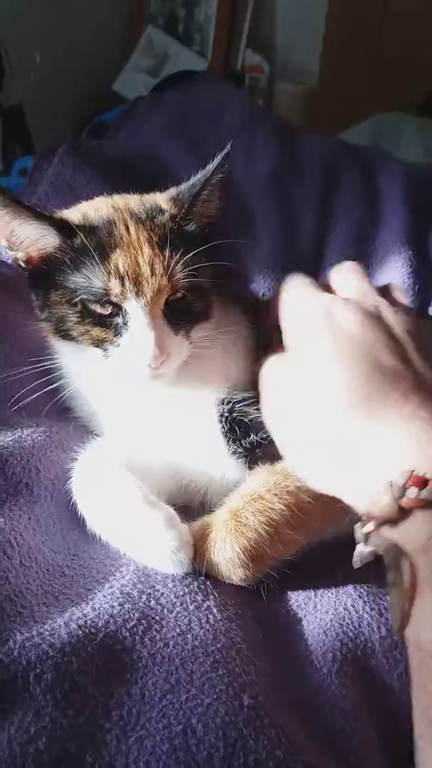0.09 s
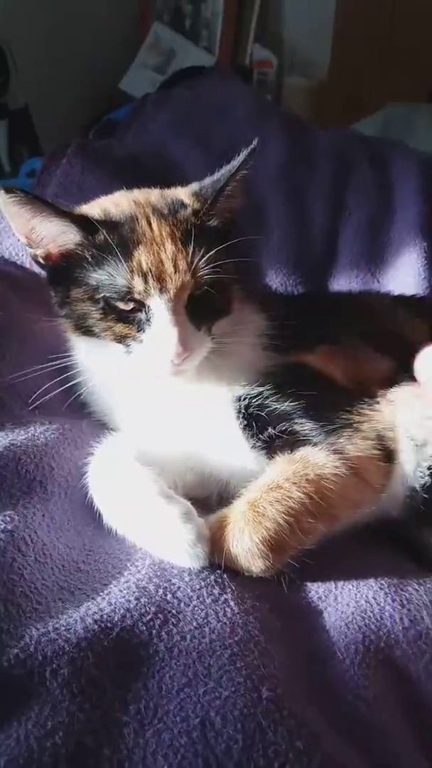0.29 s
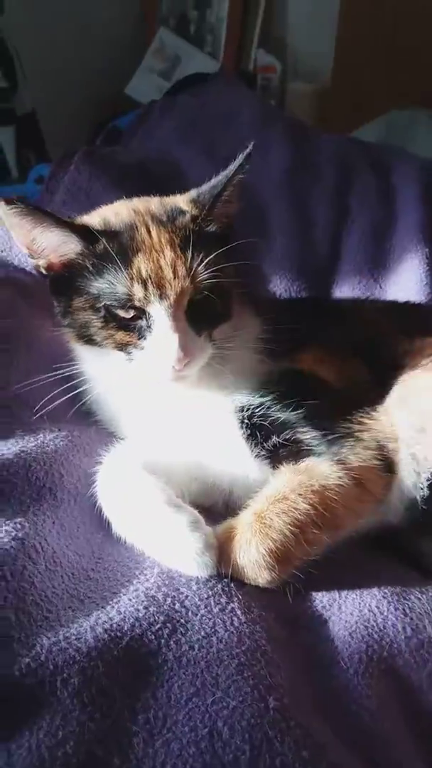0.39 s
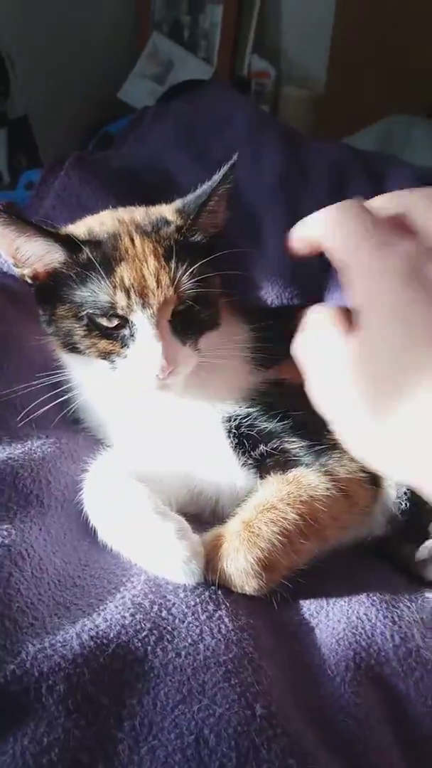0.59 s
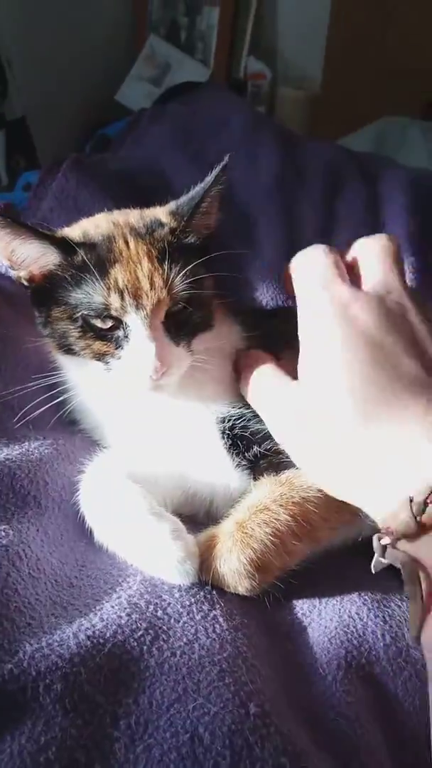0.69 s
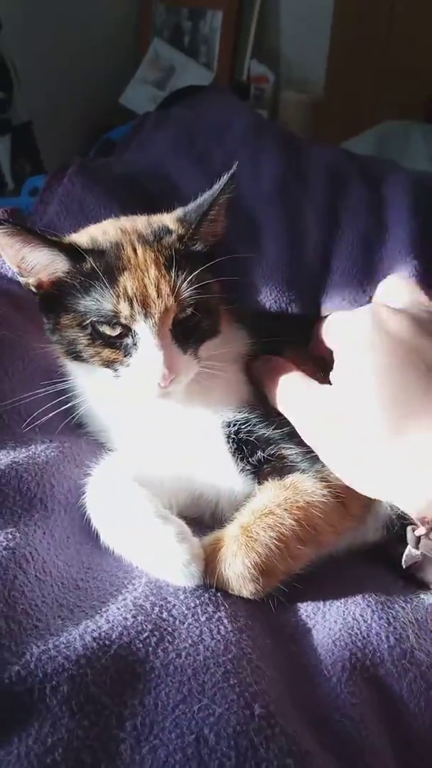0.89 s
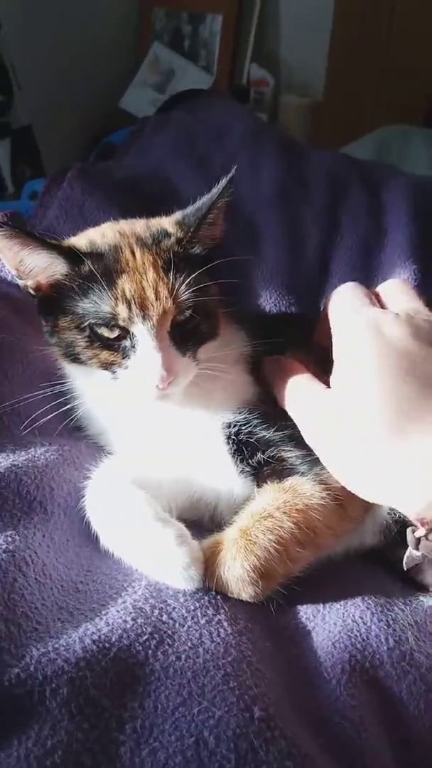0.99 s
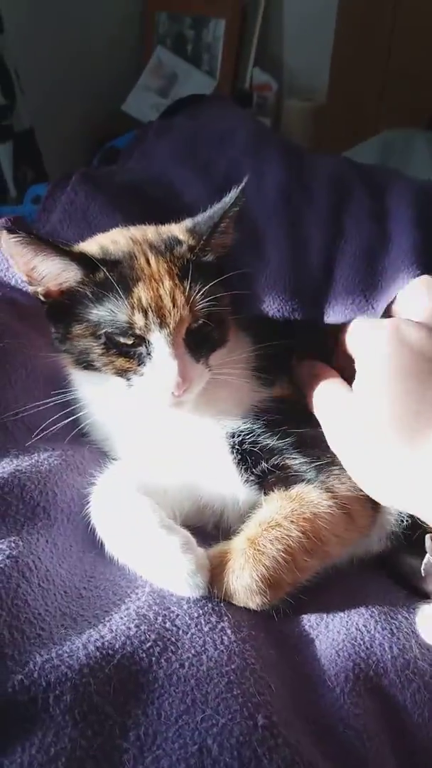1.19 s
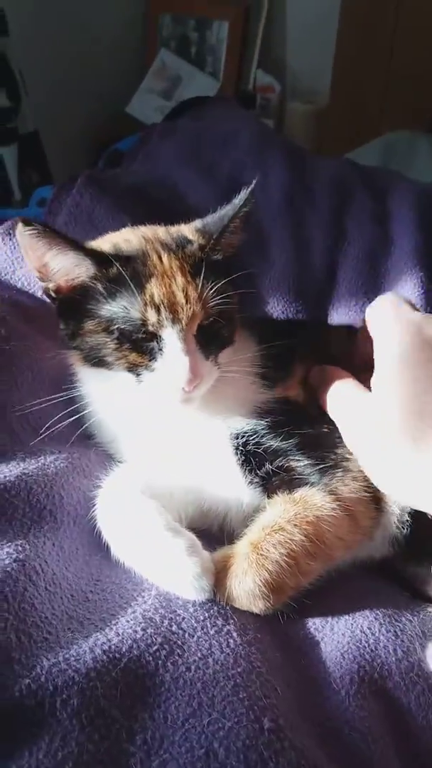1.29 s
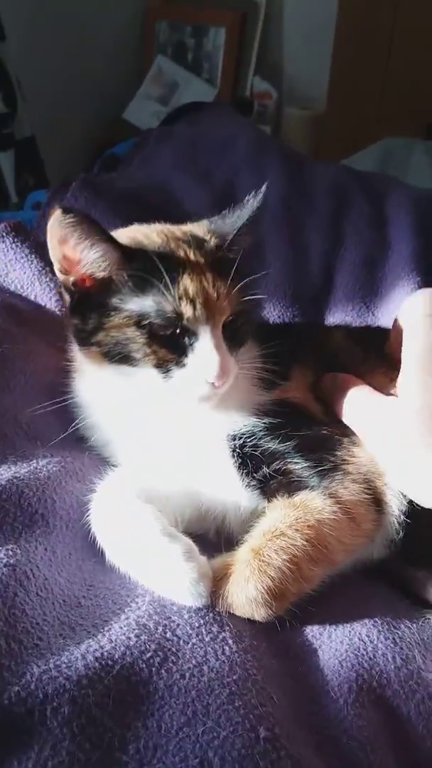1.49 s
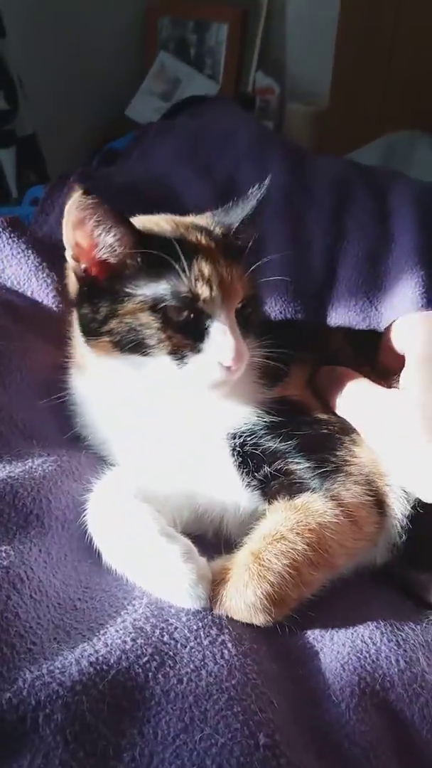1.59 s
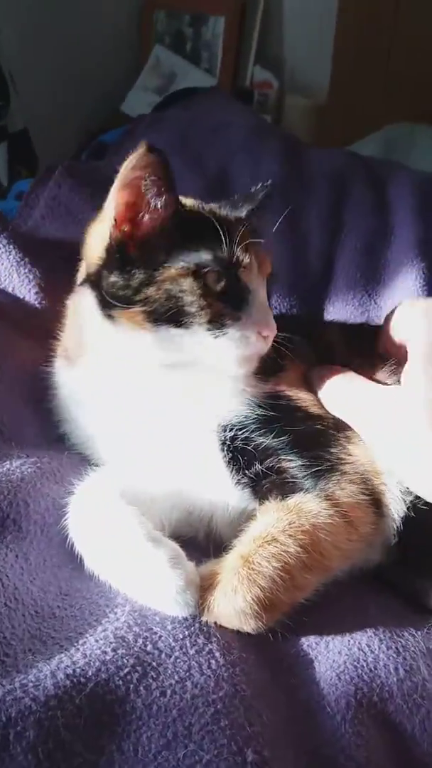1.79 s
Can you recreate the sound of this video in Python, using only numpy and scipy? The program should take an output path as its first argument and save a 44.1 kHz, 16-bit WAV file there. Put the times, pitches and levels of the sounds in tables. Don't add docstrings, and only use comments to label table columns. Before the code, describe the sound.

A hand-held phone picks up muffled, falling bumps and a few dry case ticks while fingers stroke a cat on a bed; dull rustles and a barely audible purring rumble sit over soft indoor hiss.

```python
import sys
import numpy as np
from scipy import signal
from scipy.fft import rfft, irfft, next_fast_len
from scipy.io import wavfile
from scipy.ndimage import map_coordinates

SR = 44100
rng = np.random.default_rng(int(sys.argv[2]) if len(sys.argv) > 2 else 0)


def volts(x):
    e = np.asarray(x, float) / 20
    return 10 ** e


def wrap_up_sound(samples):
    columns = np.atleast_2d(samples).T
    tamed = np.clip(columns, -1, 1)
    steps = np.round(tamed * 32767).astype(np.int16)
    wavfile.write(sys.argv[1], SR, steps)


N = 79380


def unit(x):
    return x / np.sqrt(np.mean(x ** 2) + 1e-20)


def filtered(x, response):
    size = next_fast_len(N + SR // 2)
    hz = np.fft.rfftfreq(size, 1 / SR)
    return irfft(rfft(x, size) * response(hz), size)[..., :N]


def coloured(x, points):
    point_hz, point_db = np.transpose(points)

    def response(hz):
        return volts(np.interp(np.log(hz + 1), np.log(point_hz + 1), point_db, -120, -120))

    return unit(filtered(x, response))


def wobble(rate):
    knots = rng.standard_normal(int(N * rate / SR) + 4)
    return map_coordinates(knots, [np.arange(N) * rate / SR])


def hump(hz, corner_hz, order):
    return SR / corner_hz * (1 + (hz / corner_hz) ** 2) ** -order


def bumps():
    # start_s, peak_db, softness_hz (corner), snap_db
    pushes = [(.009, -27.5, 270, -18.5), (.0285, -24.5, 193, -45.5), (0.346, -30, 340, -51),
              (0.5185, -38.5, 372, -52), (0.7263, -22.5, 330, -6), (1.274, -18, 399, -60),
              (1.277, -31.5, 443, -60), (1.380, -33, 220, -9.5), (1.4053, -15.5, 313, -24.5),
              (1.4095, -25, 466, -49), (1.481, -29, 207, -60), (1.628, -26, 254, -45),
              (1.735, -20, 387, -42), (1.745, -22.5, 200, -26), (1.757, -16.5, 100, -70)]
    # start_s, peak_db, softness_hz (corner), snap_db
    pulls = [
        (.017, -21.5, 130, -31),
        (0.023, -30, 214, -25),
        (.050, -20.5, 105, -44),
        (0.075, -32, 212, -53),
        (.186, -18, 200, -41),
        (.193, -12.5, 229, -39.5),
        (0.2019, 4, 151, -17.5),
        (0.2169, 0.5, 269, -21.5),
        (0.2227, -1, 169, -32),
        (0.7313, -11, 361, -41.5),
    ]
    snap_hz, snap_lag_s, snap_order = 755, 0.003146, 2.25
    leak = 0.2

    def spectrum(hz):
        total = 0
        for way, rows in ((1, pushes), (-1.03, pulls)):
            for start_s, peak_db, soft_hz, snap_db in rows:
                leaking = (hz / np.hypot(hz, leak * soft_hz)) ** 2
                soft = hump(hz, soft_hz, 3) * leaking
                snap = 1j * volts(snap_db) * hump(hz, snap_hz, snap_order)
                snap = snap * np.exp(-2j * np.pi * hz * snap_lag_s)
                delay = np.exp(-2j * np.pi * hz * start_s)
                total = total + way * volts(peak_db) * delay * (soft + snap)
        return total

    click = (np.arange(N) == 0).astype(float)
    return filtered(click, spectrum)


def bass_cut(x, order):
    cut_hz = 53.2
    turn_rate, knee_hz, pivot_hz, pivot_turns = 1.405, 19.1, 150, .558

    def response(hz):
        turns = turn_rate * np.log((hz + knee_hz) / (pivot_hz + knee_hz)) + pivot_turns
        loss = np.sqrt(1 + (cut_hz / (hz + 1)) ** (2 * order))
        return np.exp(-2j * np.pi * turns) / loss

    return filtered(x, response)


def strokes_db(t):
    # start_s, swell_db, fade_s
    strokes = [
        (.005, 19.5, .06),
        (0.183, 15.5, 0.031),
        (.285, 21, 0.087),
        (1.365, 19.5, .04),
        (1.472, 21, 0.062),
        (1.586, 16.5, 0.074),
        (1.619, 14, .05),
        (1.68, 9.5, 0.16),
    ]
    rise_s = 0.0058
    power = 0
    for start_s, swell_db, fade_s in strokes:
        after = np.clip(t - start_s, 0, None)
        power = power + volts(2 * swell_db) * (1 - np.exp(-after / rise_s)) * np.exp(-2 * after / fade_s)
    return 10 * np.log10(1 + power)


def purr():
    beat_hz = 27.5 * (1 + .04 * wobble(8.6))
    beats = np.diff(np.floor(np.cumsum(beat_hz / SR)), prepend=0)
    return volts(-3) * unit(beats * volts(2 * wobble(28.9)))


def small_pushes():
    per_s, spread_db, bed_share = 390, 4.5, 0.3
    happens, side, size = rng.random((3, N))
    grains = (happens < per_s / SR) * np.sign(side - .5) * volts(spread_db * (2 * size - 1))
    return np.sqrt(1 - bed_share) * unit(grains) + np.sqrt(bed_share) * rng.standard_normal(N)


def rumble():
    # start_s, rumble_db
    handling = [
        (0.0, -48.5),
        (0.13, -46.5),
        (0.45, -48.5),
        (0.656, -44.5),
        (0.816, -44),
        (1.232, -47.5),
        (1.398, -40),
        (1.594, -43.5),
        (1.8, -36.5),
    ]
    # pitch_hz, level_db (per Hz)
    low_colour = [(18, -48), (30, -32.5), (50, -3), (76, 2), (113, -7), (146, -15.5), (162, -24.5),
                  (420, -48.5), (550, -73), (920, -120)]
    # pitch_hz, level_db (per Hz)
    rustle_colour = [(100, -36.5), (160, 2.5), (260, -4.5), (400, -16.5), (650, -41), (900, -38.5)]
    t = np.arange(N) / SR
    drive = small_pushes() + purr()
    lift_db = strokes_db(t)
    low = coloured(drive, low_colour) * volts(0.17 * lift_db + .7 * wobble(9))
    rustle = coloured(drive, rustle_colour) * volts(-24 + lift_db + 1.3 * wobble(20))
    start_s, level_db = np.transpose(handling)
    return volts(np.interp(t, start_s, level_db)) * (low + rustle)


def ticks():
    # start_s, level_db, dullness_hz (corner)
    case_ticks = [
        (0.198, -50.5, 3040),
        (0.2034, -47, 1990),
        (0.2074, -44.5, 3600),
        (0.2203, -47, 2600),
        (0.7297, -43.5, 2420),
        (.7335, -50, 2460),
        (1.7985, -49, 1800),
    ]
    out = np.zeros(N + SR)
    t = np.arange(-200, 200) / SR
    swell = np.exp(-(t / .0011) ** 2)
    for start_s, level_db, dullness_hz in case_ticks:
        burst = rng.standard_normal(len(t)) * volts(level_db) * swell
        band = signal.butter(3, [600, dullness_hz], "band", fs=SR, output="sos")
        first = round((start_s + t[0]) * SR)
        out[first:first + len(t)] += signal.sosfilt(band, burst)
    return out[:N]


def hiss():
    # pitch_hz, level_db (per Hz)
    hiss_colour = [(300, -6), (600, -2), (1600, -5.5), (4000, -11.5), (5500, -17.5), (7800, -21),
                   (10500, -15), (13000, -9), (15700, -11.5)]
    return volts(-69.5) * coloured(rng.standard_normal(N), hiss_colour)


def scene():
    thumps = bass_cut(bumps(), 10.9)
    low_rumble = bass_cut(rumble(), 0) * np.sqrt(2)
    return (thumps + low_rumble + ticks() + hiss())[None]


def band_limit(x):
    return signal.sosfilt(signal.butter(12, 16750, fs=SR, output="sos"), x)


def record(dry):
    return band_limit(dry)


dry = scene()
out = record(dry)
wrap_up_sound(out)
```